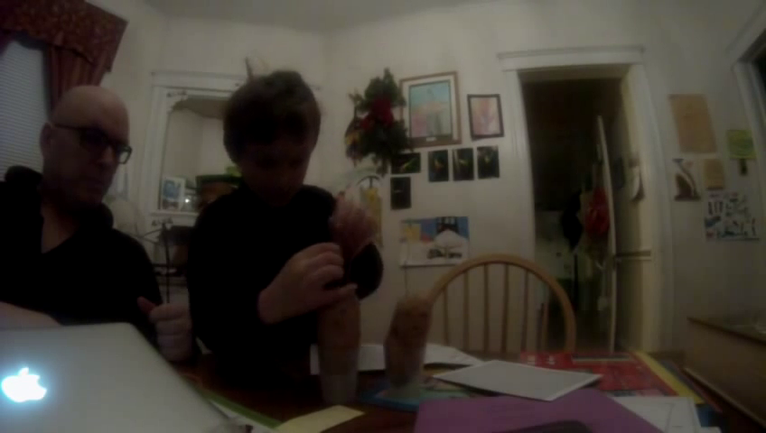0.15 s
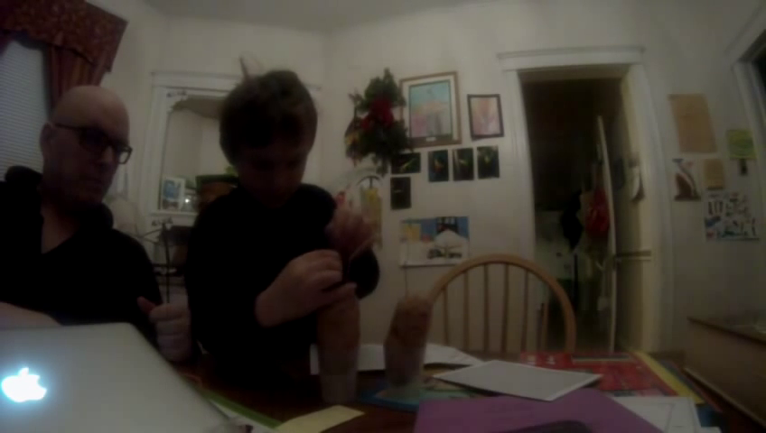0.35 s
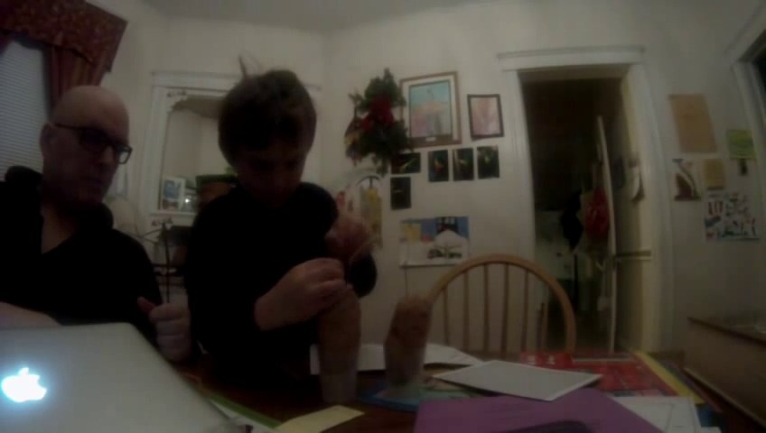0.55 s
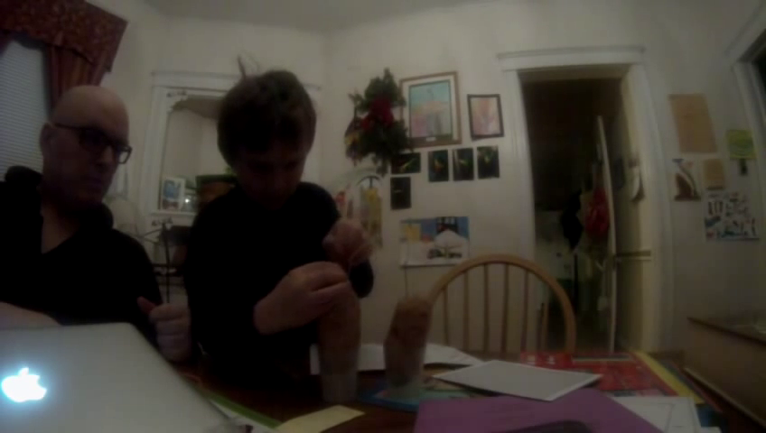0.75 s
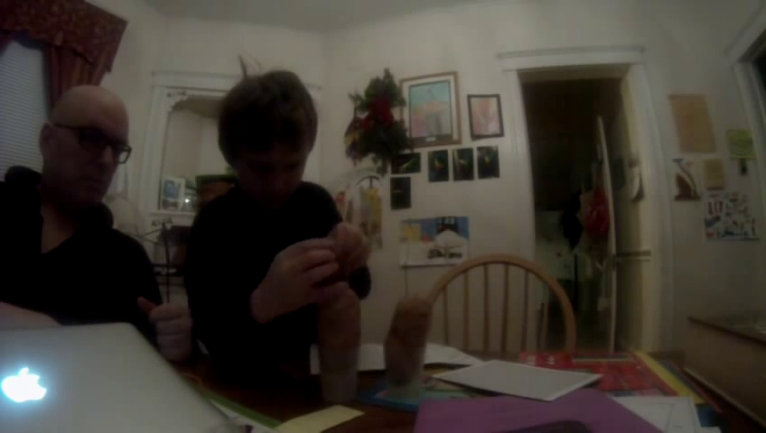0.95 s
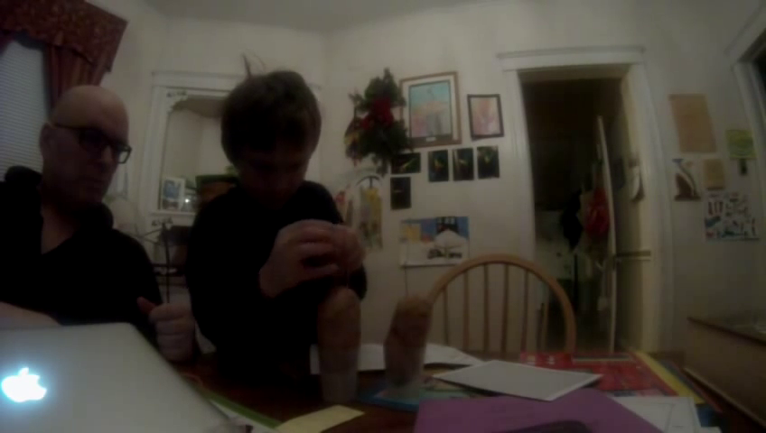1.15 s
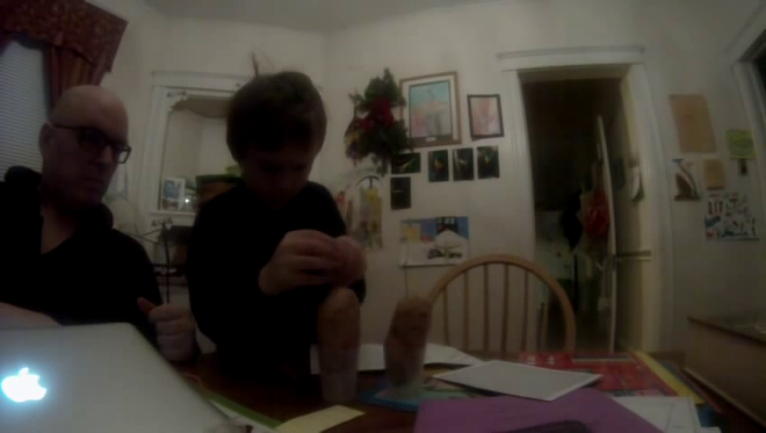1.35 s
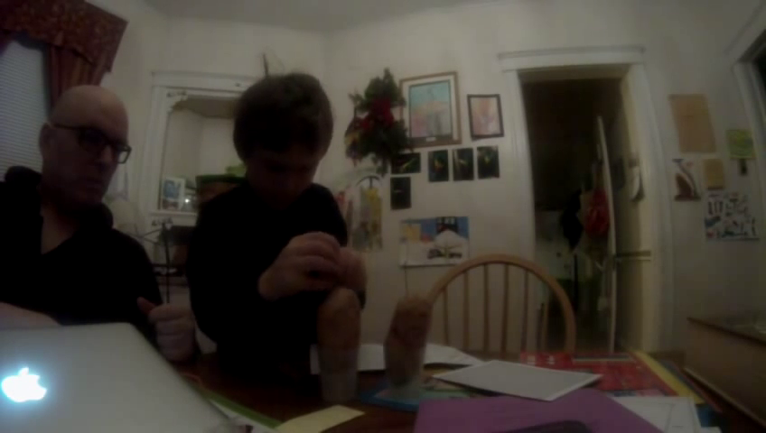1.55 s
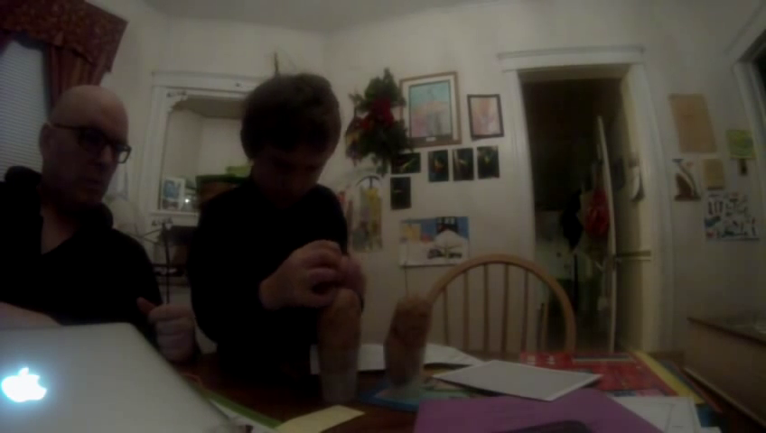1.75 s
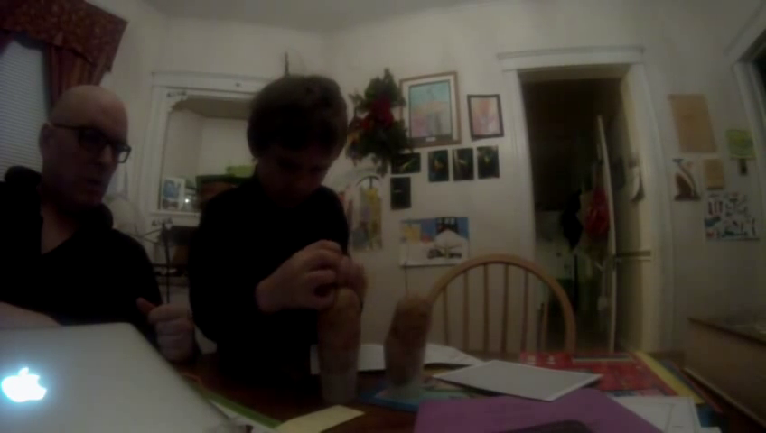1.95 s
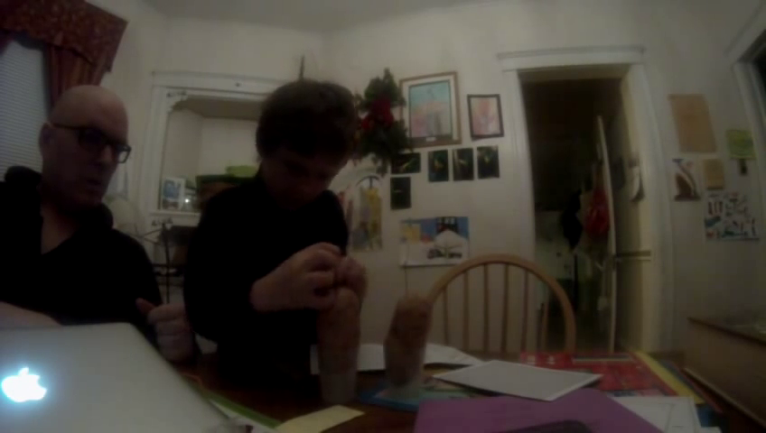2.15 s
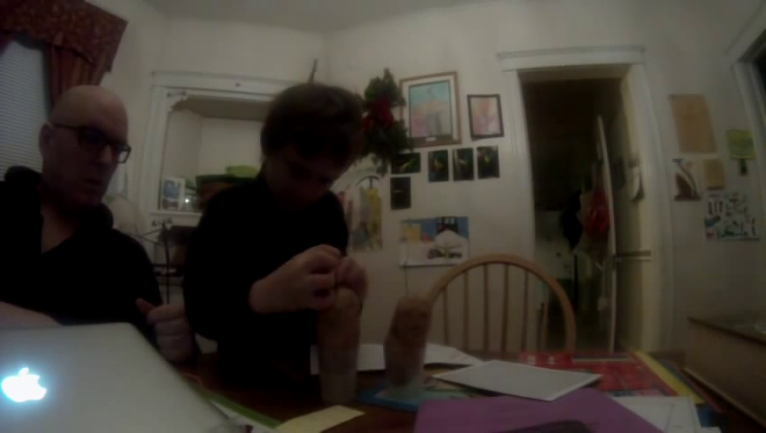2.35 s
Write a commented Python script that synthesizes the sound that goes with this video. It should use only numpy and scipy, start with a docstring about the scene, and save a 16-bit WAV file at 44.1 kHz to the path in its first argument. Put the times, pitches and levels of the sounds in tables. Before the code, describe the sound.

Potatoes handled and pushed down on a table in muffled, uneven bumps, with quiet low hum beneath

```python
"""In a small room, potatoes are pressed down onto a stack on a wooden table.
Each press is a cluster of soft contacts: short pushes excite the damped modes of the table top.
Skin rubs faintly on skin: enveloped noise through the table, a wavering creak and a resonant scrape.
Under it lie a low building rumble of wavering tones, a faint hum of steady sines and
the microphone's hiss, coloured noise that widens toward the treble."""
import sys
import numpy as np
from scipy import signal
from scipy.fft import rfft, irfft
from scipy.io import wavfile

SR = 44100
rng = np.random.default_rng(int(sys.argv[2]) if len(sys.argv) > 2 else 0)


def pcm_store(signal):
    """Save signal as 16-bit PCM."""
    levels = np.round(np.clip(np.atleast_2d(signal), -1, 1) * 32767)
    wavfile.write(sys.argv[1], SR, levels.astype(np.int16).T)


N = 105840  # length in samples

# Wavering drones of the building: [f/Hz, rms wander/Hz, rms level before the swell/dB]
RUMBLE_DRONES = [(26.5, 2.03, -56.5), (39, 1.5, -53.5)]
# Slow swell of the rumble: [t/s, level/dB]
RUMBLE_SWELL = [(0, -4), (.2, -3), (.3, 4), (.48, -3), (.68, 6.5), (.82, 3), (1.15, -2.5), (1.35, 1.5),
                (1.65, -2), (1.88, 2.5), (2.4, -1.5)]
# Steady hum and thin electrical whine: [f/Hz, rms level/dB]
HUM_TONES = [(120, -69.5), (447, -94.5), (1204, -86), (14566, -101)]
# Relative spectrum of room tone and hiss: [f/Hz, level/dB]
HISS_SPECTRUM = [(25, -8.5), (60, -7), (100, -15), (150, -13), (200, -15), (335, -20), (608, -23.5),
                 (800, -25.5), (1150, -27.5), (2000, -31), (2700, -32), (5000, -38), (8000, -42),
                 (11000, -47), (13000, -50.5), (14700, -54)]
# Stereo width of the hiss: [f/Hz, side minus mid level/dB]
HISS_WIDTH = [(125, -50), (350, -27.5), (700, -19.5), (1400, -16), (2800, -11.5), (5600, -8), (10000, -7.5),
              (13500, -14)]
# Rubs of skin on skin: [t/s, length/s, shudder level/dB, creak level/dB, scrape level/dB]
SKIN_RUBS = [(0.218, 0.1, -44.5, -56, -70.5), (0.502, 0.11, -40.5, -64, -74),
             (1.214, 0.14, -45.5, -63.5, -63), (1.67, .14, -50, -75, -67.5), (1.798, 0.19, -55, -88, -83),
             (2.049, 0.11, -51.5, -72, -79), (2.225, 0.088, -50.5, -80, -80)]
# Resonances of the scrape: [f/Hz, width/Hz, relative level/dB]
SCRAPE_RESONANCES = [(580, 69, -7), (995, 31, -2.5), (1216, 95, 5.5), (1510, 200, -2.5)]
# Soft contacts, one cluster per press: [t/s, relative level/dB, contact length/ms]
SOFT_CONTACTS = [(0.227, 3.2, 5.73), (0.2503, -13, 2.2), (0.255, -6, 3.5), (0.2781, -1.9, 2.84),
                 (0.286, -12.5, 1.63), (0.3184, -9, 4.2), (0.3524, -17, 5.3), (0.5283, -3.5, 3.3),
                 (0.5542, -6, 2.56), (0.582, -13.5, 2.7), (0.5976, -7.5, 4), (0.6136, -5.5, 3.9),
                 (0.6386, -13, 3.4), (0.6616, -15, 4.1), (0.744, -19.5, 2.3), (1.0725, -11, 6.8),
                 (1.1063, -23, 6.3), (1.2409, -13.5, 3.6), (1.2552, -5, 2.6), (1.265, -2.5, 3.08),
                 (1.2873, -4.5, 2.97), (1.316, -12.7, 3.3), (1.326, -3.5, 4.3), (1.3598, -18, 4),
                 (1.3713, -15.5, 4), (1.4537, -6, 5.7), (1.4932, -13, 5.7), (1.5469, -25, 4.2),
                 (1.6745, -26.5, 2.6), (1.7136, -12.5, 3.5), (1.73, -7.5, 3.4), (1.7436, -5.5, 4.1),
                 (1.7629, -5, 5.94), (1.788, -9.5, 3), (1.8111, -10.5, 4.2), (1.8885, -19.5, 3.8),
                 (1.9236, -20.5, 3.9), (1.989, -28.5, 3.1), (2.0556, -7.1, 5.56), (2.0645, -8, 3.3),
                 (2.0889, -23, 3.4), (2.1109, -11.8, 5.2), (2.2378, -15.5, 3.25), (2.263, -20.5, 3.8)]
# Modes of the loaded table top: [f/Hz, relative level/dB, 60 dB decay time/s]
TABLE_MODES = [(143.4, -11.5, 0.14), (151.9, 4, 0.149), (179.1, -1.0, 0.13), (187, -14.5, 0.09),
               (227.4, -8.5, 0.13), (281, -25.5, 0.2), (443, -12.5, 0.16)]

HISS_DB = -64.5  # rms of the mid hiss above 500 Hz
CREAK_HZ, CREAK_WANDER_HZ = 453, 8.1
THUMP_DB, BASS_CUT_HZ = -27, 110
ROOM_T60_S, ROOM_DB, ROOM_DELAY_S = 0.3, -21.5, 0.012
TOP_HZ = 14900


def undb(db):
    """Level: an amplitude ratio is ten to the power of dB / 20."""
    return 10 ** (np.asarray(db) / 20)


def unit(x):
    """Normalisation: divide by the root mean square, giving rms 1."""
    return x / np.sqrt(np.mean(x ** 2))


def bin_frequencies():
    """Discrete spectrum: frequencies of its bins in Hz, held at 1 Hz or more."""
    return np.maximum(np.arange(N // 2 + 1) * SR / N, 1)


def colour(x, points):
    """Spectral shaping: weight x by (Hz, dB) points joined on a log-frequency axis."""
    hz, db = np.array(points).T
    level = np.interp(np.log(bin_frequencies()), np.log(hz), db)
    return irfft(rfft(x) * undb(level), N)


def band_noise(hz, width):
    """Resonance: noise through one steep-sided peak, rms 1."""
    f = bin_frequencies()
    detuning = (f - hz * hz / f) / (2 * width)
    spectrum = rfft(rng.standard_normal(N)) / (1 + detuning ** 2) ** 2
    return unit(irfft(spectrum, N))


def swell(start, length):
    """Envelope: a smooth sine-squared rise and fall of height 1."""
    progress = np.clip((np.arange(N) / SR - start) / length, 0, 1)
    return np.sin(np.pi * progress) ** 2


def waver(hz, wander_hz):
    """Frequency modulation: a tone of rms 1 whose pitch wanders at random."""
    drift = band_noise(2 * wander_hz, wander_hz)
    cycles = np.cumsum(hz + wander_hz * drift) / SR
    return np.sqrt(2) * np.sin(2 * np.pi * (cycles + rng.random()))


def rumble():
    """Superposition: low wavering drones share one slow swell."""
    drones = sum(undb(db) * waver(hz, wander) for hz, wander, db in RUMBLE_DRONES)
    swell_t, swell_db = np.array(RUMBLE_SWELL).T
    return drones * undb(np.interp(np.arange(N) / SR, swell_t, swell_db))


def hum():
    """Superposition: steady sines of random phase add."""
    t = np.arange(N) / SR
    return sum(undb(db) * np.sqrt(2) * np.sin(2 * np.pi * (hz * t + rng.random()))
               for hz, db in HUM_TONES)


def hiss():
    """Decorrelation: an independent side noise, stronger in the treble, widens the mid noise."""
    mid = colour(rng.standard_normal(N), HISS_SPECTRUM)
    side = colour(colour(rng.standard_normal(N), HISS_SPECTRUM), HISS_WIDTH)
    treble = signal.sosfilt(signal.butter(4, 500, "high", fs=SR, output="sos"), mid)
    left_right = mid + side * np.array([[1], [-1]])
    return left_right * undb(HISS_DB) / treble.std()


def background():
    """Superposition: rumble and hum in the middle lie under the stereo hiss."""
    return rumble() + hum() + hiss()


def table(force):
    """Modal response: force rings the damped table modes, which radiate little deep bass."""
    t = np.arange(SR // 2) / SR
    ring = sum(undb(db - 60 * t / t60) * np.sin(2 * np.pi * hz * t) for hz, db, t60 in TABLE_MODES)
    bass_cut = signal.butter(3, BASS_CUT_HZ, "high", fs=SR, output="sos")
    return signal.sosfilt(bass_cut, signal.fftconvolve(force, ring)[:N])


def rubs():
    """Friction: rubbing makes the table shudder and ring with a wavering creak, and the skins scrape faintly."""
    shudder = unit(table(rng.standard_normal(N)))
    creak = waver(CREAK_HZ, CREAK_WANDER_HZ)
    scrape = unit(sum(undb(db) * band_noise(hz, width) for hz, width, db in SCRAPE_RESONANCES))
    total = np.zeros(N)
    for start, length, shudder_db, creak_db, scrape_db in SKIN_RUBS:
        friction = undb(shudder_db) * shudder + undb(creak_db) * creak + undb(scrape_db) * scrape
        total += swell(start, length) * friction
    return total


def thumps():
    """Impulse: each contact is a short soft push; at equal impulse, longer pushes sound duller."""
    force = np.zeros(N)
    for start, db, ms in SOFT_CONTACTS:
        push = swell(start, ms / 1000)
        force += undb(db) * push / push.sum()
    return undb(THUMP_DB) * table(force)


def room(x):
    """Reverberation: the walls add a short diffuse tail that decays exponentially."""
    t = np.arange(SR) / SR
    decay = np.exp(-np.log(1000) * t / ROOM_T60_S) * (t > ROOM_DELAY_S)
    tail = rng.standard_normal(SR) * decay
    return x + undb(ROOM_DB) * signal.fftconvolve(x, tail / np.linalg.norm(tail))[:N]


def scene():
    """Superposition: rubs and thumps in the room lie over the background."""
    return background() + room(rubs() + thumps())


def record(dry):
    """Band limiting: the recorder's steep low-pass cuts the top."""
    return signal.sosfilt(signal.ellip(10, 0.2, 70, TOP_HZ, fs=SR, output="sos"), dry)


dry = scene()
out = record(dry)
pcm_store(out)
```